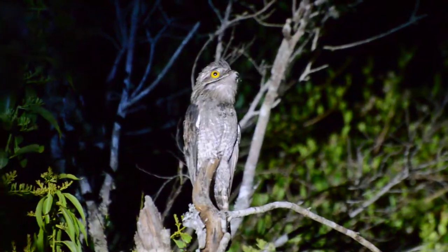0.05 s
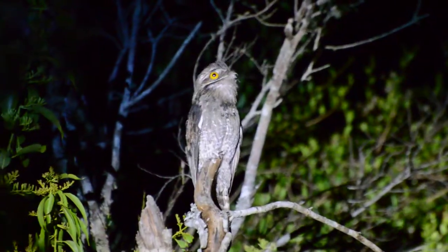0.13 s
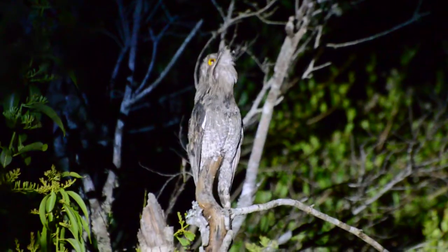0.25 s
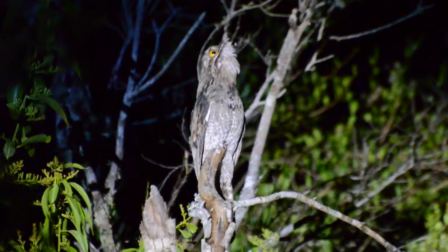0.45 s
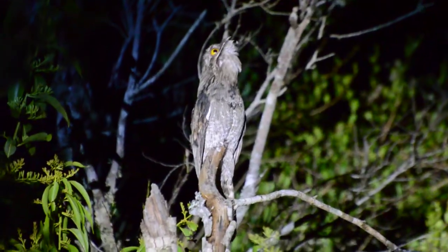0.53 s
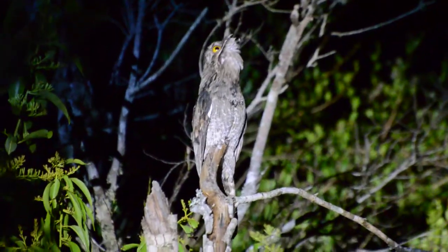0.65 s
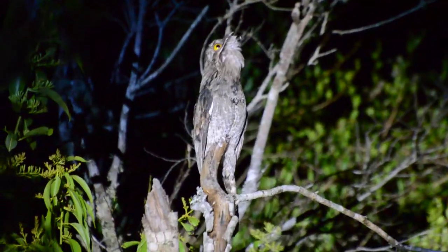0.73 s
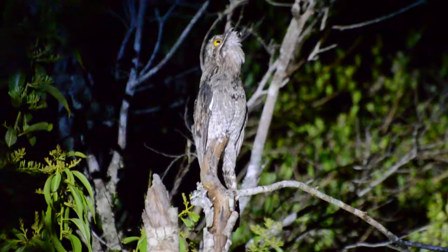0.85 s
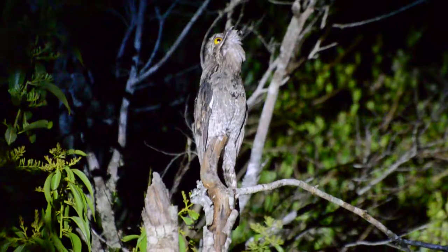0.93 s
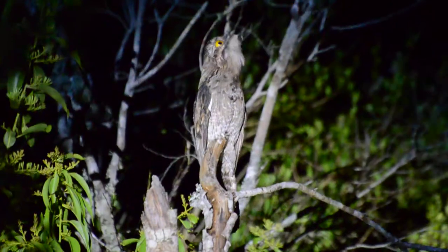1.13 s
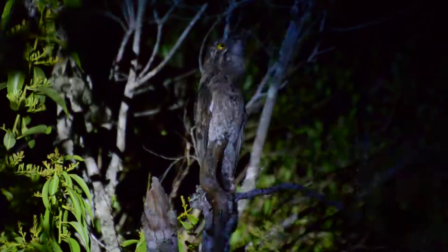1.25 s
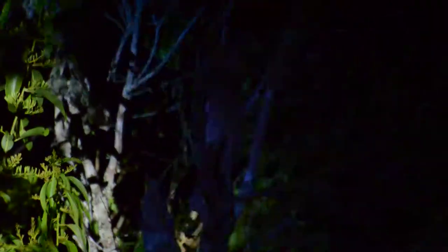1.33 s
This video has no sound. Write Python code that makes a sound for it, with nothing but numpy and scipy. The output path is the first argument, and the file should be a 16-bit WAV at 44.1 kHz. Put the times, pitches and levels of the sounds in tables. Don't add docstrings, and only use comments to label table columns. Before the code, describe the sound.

Close handling clicks on a camera open the scene, then a perched bird swells a steady, flute-like whistle for about a second, echoing softly among trees over quiet hiss and pulsing crickets.

```python
import sys
import numpy as np
from scipy import signal
from scipy.fft import rfft, irfft
from scipy.io import wavfile
from scipy.ndimage import uniform_filter1d

SR = 44100
rng = np.random.default_rng(int(sys.argv[2]) if len(sys.argv) > 2 else 0)


def generate_wav(sig):
    pcm = np.round(np.clip(np.atleast_2d(sig).T, -1, 1) * 32767).astype(np.int16)
    wavfile.write(sys.argv[1], SR, pcm)


def elevation(decibels):
    levels = np.asarray(decibels, float)
    return 10 ** (levels / 20)


N = 61739

# [f/Hz, density/dB]
HISS_COLOUR = [(20, -34.5), (45, -23.5), (100, -11.5), (280, -12.5), (1200, -10), (3700, -25.5),
               (4400, -29.5), (9000, -40.5), (15500, -45)]
HISS_DB = -58
# [f/Hz, width/Hz, level/dB]
AIR_HUMPS = [(127, 59, -71.5), (155, 25, -73), (490.8, 100, -66), (4017, 260, -75.5), (2013, 190, -67),
             (2777, 110, -68), (3357, 500, -65.5), (5580, 450, -88.5)]

# [f/Hz, first chirp t/s, period/s, chirp length/s]
CRICKET_SONGS = [
    (2122, -.04, .1925, .095),
    (3455, .002, .1562, .028),
    (3445, .043, .1562, .026),
    (3590, .125, .152, .028),
    (2700, .095, .0335, .022),
    (5700, .09, .03, .018),
    (10850, .1, .13, .08),
]
CRICKET_LEVELS = [-62, -60.5, -61.5, -70.5, -65.5, -82.5, -95]
CRICKET_ROUGH, CRICKET_VARY_DB = .5, 1.8

# [t/s, body level/dB, body f/Hz, bright level/dB, t60/s]
HAND_TICKS = [(.0005, -50, 1350, -72, .05), (.0065, -53, 1250, -76, .03), (.011, -48, 1300, -76, .03),
              (.0162, -46, 1200, -56, .012), (.0169, -37, 720, -64, .015), (.0193, -45, 800, -74, .015),
              (.0218, -50, 700, -76, .02), (.027, -52, 1500, -61, .025), (.0531, -34, 1300, -54, .012),
              (.0566, -43, 1550, -64, .02), (.0595, -49, 1400, -72, .025), (.3725, -58, 2500, -67, .015),
              (.3775, -38, 1500, -56, .022), (.3783, -39, 720, -70, .016), (.3805, -51, 230, -67, .03),
              (.384, -48, 600, -70, .016), (.4308, -45, 1450, -52, .022), (.4375, -56, 1450, -59, .02),
              (.443, -58, 1400, -67, .02), (1.29, -70, 2000, -78, .05)]
# [f/Hz, width/Hz, level/dB]
SHELL_MODES = [(1500, 600, -2), (2400, 1000, -2), (3300, 1400, -1), (5000, 1400, -4), (7400, 1000, -4),
               (9300, 1500, -14), (11000, 900, -10), (12800, 1600, -4), (14600, 1200, -14)]
# [t/s, level/dB, f/Hz, length/s]
FINGER_BUMPS = [
    (0.929, -58, 593, 0.0336),
    (.97, -58, 504.5, 0.024),
    (1.093, -63, 703, 0.073),
    (1.155, -54.5, 1507, .02),
    (1.322, -57.5, 383.4, 0.027),
    (.808, -62.5, 11700, 0.0021),
]
# [start t/s, length/s, level/dB]
HAND_RUBS = [
    (-.03, 0.12, -63),
    (0.372, 0.12, -82),
    (0.4, .1, -65.5),
]
RUB_TOP_HZ, LOW_CUT_HZ = 5000, 70
RATTLE = .25
SECOND_MODE, SECOND_SHARE = 1.65, .55

# [t/s, f/Hz]
WHISTLE_PITCH = [(.18, 988), (.196, 962), (.214, 1072), (.24, 1110), (.3, 1150), (.4, 1192), (.55, 1209),
                 (.72, 1200), (.9, 1177), (1.06, 1151), (1.226, 1140)]
# [t/s, level/dB]
BREATH_EFFORT = [(.175, -78), (.21, -48), (.245, -36.5), (.29, -43.5), (.4, -31.5), (.435, -34),
                 (.46, -29.5), (.51, -31), (.66, -29.5), (.81, -26), (.885, -27.5), (.93, -27),
                 (1.01, -31.5), (1.05, -34), (1.075, -32), (1.13, -36), (1.19, -35)]
DROP_S, DROP_LEN_S, DROP_HZ = 1.229, .01, 175
DROP_SWELL_DB, SHUT_DB_PER_S = 4, 5000
WAVER_DB, WAVER_HZ = .3, 1.2
# [multiple, level at full effort/dB]
WHISTLE_OVERTONES = [(2, -71), (3, -79), (4, -80), (5, -92)]
OVERTONE_FOLLOW = .3
BEAK_HZ, BEAK_WIDTH_HZ, BEAK_DB = 5660, 110, 15

# [delay t/s, level/dB]
TRUNK_ECHOES = [
    (.0079, -12),
    (.0175, -17),
    (.21, -23),
]
NEAR_DB, NEAR_T60_S = -22, .05
FAR_DB, FAR_T60_S = -28, 2.2

# [t/s, f/Hz, level/dB]
STRAP_SQUEAK = [
    (.405, 6350, -84),
    (.411, 6150, -74),
    (.432, 5350, -69),
    (.45, 5980, -72),
    (.48, 6110, -74),
    (.503, 6090, -74),
    (.509, 5700, -88),
]
SQUEAK_OCTAVE_DB = -5

WHINE_HZ, WHINE_DB = 15685, -79
OFFSET = .0006


def evened(x):
    return x / np.sqrt(np.mean(x ** 2) + 1e-20)


def resonate(x, hz, width):
    turn = np.exp(2j * np.pi * hz * np.arange(len(x)) / SR)
    r = np.exp(-np.pi * width / SR)
    return 2 * (turn * signal.lfilter([1 - r], [1, -r], x / turn)).real


def narrow_noise(hz, width):
    once = resonate(rng.standard_normal(N), hz, width)
    return evened(resonate(once, hz, width))


def wander(rate_hz):
    f = np.geomspace(rate_hz / 10, rate_hz, 20)[:, None]
    waves = np.sin(2 * np.pi * (f * np.arange(N) / SR + rng.random(f.shape)))
    return evened((waves / np.sqrt(f)).sum(0))


def night():
    frames = N // 128 + 5
    real, imag, patches = rng.standard_normal((frames, 257, 3)).T
    patches = uniform_filter1d(patches, size=5, axis=0)
    patches = evened(uniform_filter1d(patches, size=16, axis=1))
    spectrum = (real + 1j * imag) * elevation(1.5 * patches)
    white = evened(signal.istft(spectrum, nperseg=512, noverlap=384)[1][:N])
    f, db = np.transpose(HISS_COLOUR)
    colour = elevation(np.interp(np.log(np.fft.rfftfreq(N, 1 / SR) + 1), np.log(f), db))
    out = elevation(HISS_DB) * evened(irfft(rfft(white) * colour, N))
    for hz, width, db in AIR_HUMPS:
        out = out + elevation(db) * narrow_noise(hz, width)
    return out


def crickets():
    t = np.arange(N) / SR
    out = 0
    for (hz, first, period, length), db in zip(CRICKET_SONGS, CRICKET_LEVELS):
        since_chirp = (t - first + .002 * wander(8)) % period
        u = np.clip(since_chirp / length, 0, 1)
        tone = np.sqrt(2) * np.sin(2 * np.pi * hz * t + wander(25))
        fuzz = narrow_noise(hz, 89)
        shape = np.minimum(2.5 * np.sin(np.pi * u), 1) * (1 - .3 * u)
        level = elevation(db + CRICKET_VARY_DB * wander(7.2))
        out = out + level * shape * (tone + CRICKET_ROUGH * fuzz)
    return out


def shell(noise):
    return evened(sum(elevation(db) * evened(resonate(resonate(noise, hz, width), hz, width))
                      for hz, width, db in SHELL_MODES))


def tick(body_db, hz, bright_db, t60):
    t = np.arange(4000) / SR
    low, high = rng.standard_normal((2, 4000))
    ring = np.minimum(t / .0005, 1) * elevation(-60 * t / t60)
    body = np.sin(2 * np.pi * hz * t)
    body = body + SECOND_SHARE * np.sin(2 * np.pi * SECOND_MODE * hz * t)
    body = body + .3 * evened(resonate(low, hz, .7 * hz))
    snap_fade = (elevation(-60 * t / .008) + RATTLE * ring) * np.minimum(t / .0003, 1)
    return elevation(body_db + 5) * ring * body + elevation(bright_db + 9) * snap_fade * shell(high)


def bump(db, hz, length):
    t = np.arange(4000) / SR
    swell = np.sin(np.pi * np.clip(t / length, 0, 1)) ** 2
    return elevation(db + 5.5) * swell * np.sin(2 * np.pi * hz * t)


def rubbing():
    t = np.arange(N) / SR
    stroke = sum(elevation(db) * np.sin(np.pi * np.clip((t - s) / length, 0, 1)) for s, length, db in HAND_RUBS)
    skin = signal.lfilter(*signal.butter(1, RUB_TOP_HZ, fs=SR), shell(rng.standard_normal(N)))
    return stroke * elevation(3 * wander(150)) * evened(skin)


def handling():
    hits = np.zeros(N + 4000)
    for s, *strike in HAND_TICKS:
        hits[round(s * SR):][:4000] += tick(*strike)
    for s, *push in FINGER_BUMPS:
        hits[round(s * SR):][:4000] += bump(*push)
    low_cut = signal.butter(2, 2 * LOW_CUT_HZ, "high", fs=SR)
    return signal.lfilter(*low_cut, hits[:N] + rubbing())


def whistle():
    t = np.arange(N) / SR
    drop = np.clip((t - DROP_S) / DROP_LEN_S, 0, 1)
    hz = uniform_filter1d(np.interp(t, *np.transpose(WHISTLE_PITCH)), size=800)
    hz = hz - DROP_HZ * drop ** 1.18 + WAVER_HZ * wander(30)
    db = uniform_filter1d(np.interp(t, *np.transpose(BREATH_EFFORT)), size=600)
    db = db + WAVER_DB * wander(40)
    shut_db = DROP_SWELL_DB * drop - SHUT_DB_PER_S * np.maximum(t - DROP_S - .7 * DROP_LEN_S, 0)
    turns = 2 * np.pi * np.cumsum(hz) / SR
    out = elevation(db) * np.sin(turns)
    for k, top_db in WHISTLE_OVERTONES:
        beak = 1 + elevation(BEAK_DB) / (1 + ((k * hz - BEAK_HZ) / BEAK_WIDTH_HZ) ** 2)
        effort_db = OVERTONE_FOLLOW * (db - db.max()) + np.minimum(db + 42, 0) + 1.5 * wander(15)
        out = out + elevation(top_db + effort_db) * beak * np.sin(k * turns)
    started = t > BREATH_EFFORT[0][0]
    return np.sqrt(2) * elevation(shut_db) * started * out


def wood(call):
    t = np.arange(N) / SR
    fade = elevation(-60 * t / np.array([[NEAR_T60_S], [FAR_T60_S]]))
    near, far = rng.standard_normal((2, N)) * fade * (t > .003)
    tail = elevation(NEAR_DB) * near / np.linalg.norm(near) + elevation(FAR_DB) * far / np.linalg.norm(far)
    for delay, db in TRUNK_ECHOES:
        tail[round(delay * SR)] += elevation(db)
    return signal.fftconvolve(call, tail)[:N]


def squeak():
    t = np.arange(N) / SR
    s, pitch, db = np.transpose(STRAP_SQUEAK)
    glide = np.interp(t, s, pitch)
    hz = uniform_filter1d(glide, size=300) + 25 * wander(200)
    turns = 2 * np.pi * np.cumsum(hz) / SR
    gain = elevation(np.interp(t, s, db, -150, -150) + 3.4 * wander(83))
    rasp = .6 + .7 * evened(uniform_filter1d(rng.standard_normal(N), size=90))
    rasp = rasp * np.clip((glide - 5500) / 500, .2, 1)
    return np.sqrt(2) * gain * (np.sin(turns) + elevation(SQUEAK_OCTAVE_DB) * rasp * np.sin(2 * turns))


def scene():
    bird = whistle()
    return (night() + crickets() + handling() + bird + wood(bird) + squeak())[None]


def electronics():
    return np.sqrt(2) * elevation(WHINE_DB) * np.sin(2 * np.pi * WHINE_HZ * np.arange(N) / SR) + OFFSET


def band_limit(x):
    return signal.sosfilt(signal.butter(12, 16320, fs=SR, output="sos"), x)


def record(dry):
    return band_limit(dry + electronics())


dry = scene()
out = record(dry)
generate_wav(out)
```